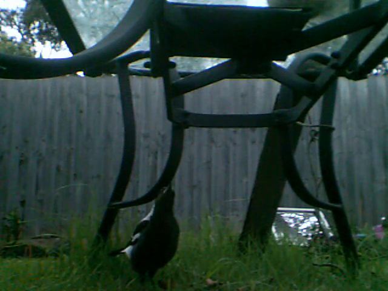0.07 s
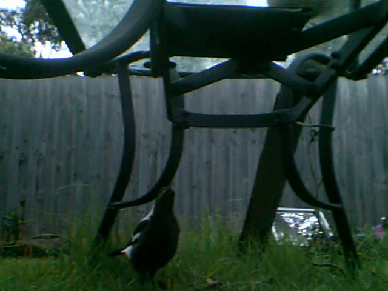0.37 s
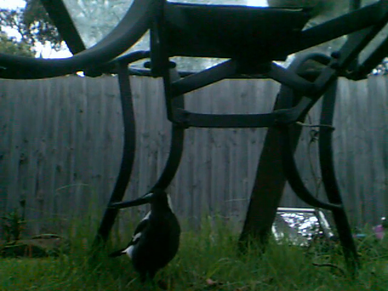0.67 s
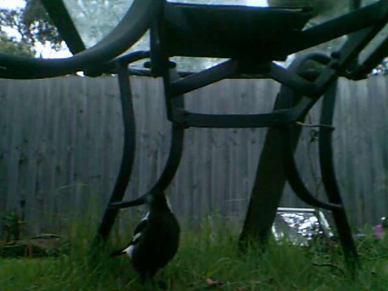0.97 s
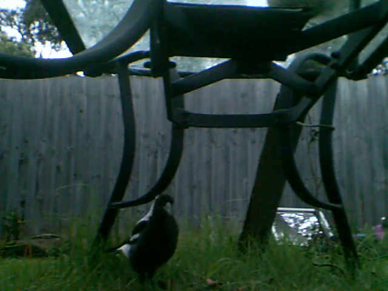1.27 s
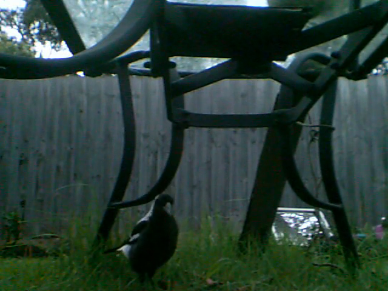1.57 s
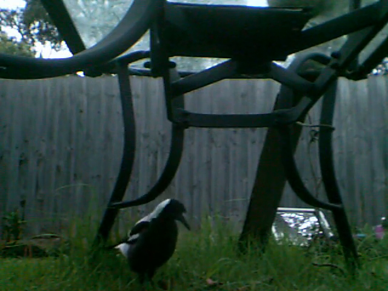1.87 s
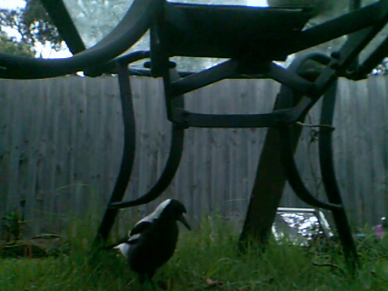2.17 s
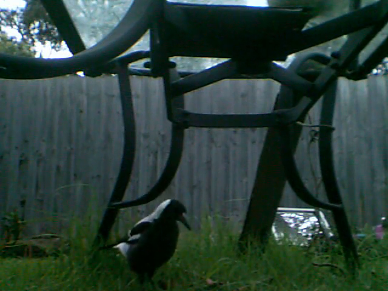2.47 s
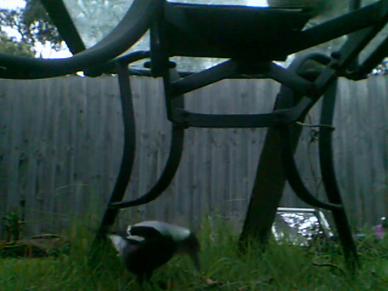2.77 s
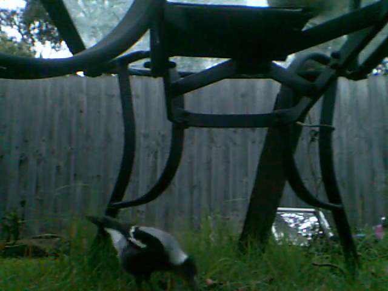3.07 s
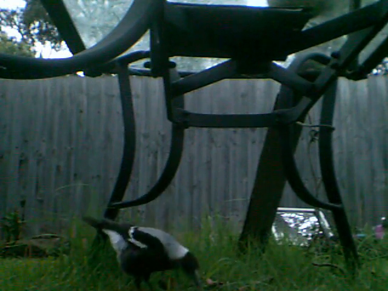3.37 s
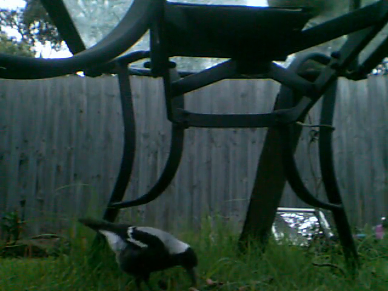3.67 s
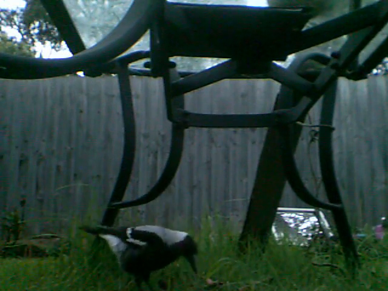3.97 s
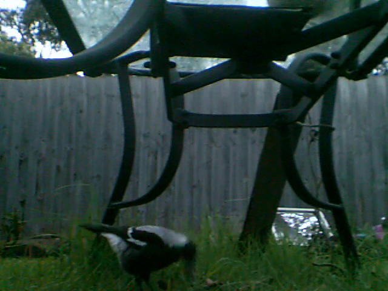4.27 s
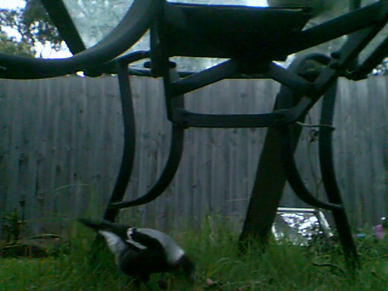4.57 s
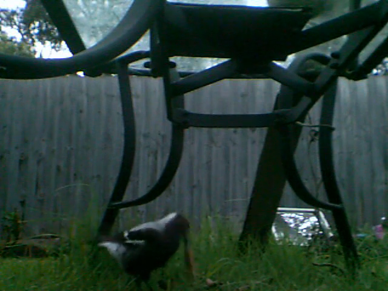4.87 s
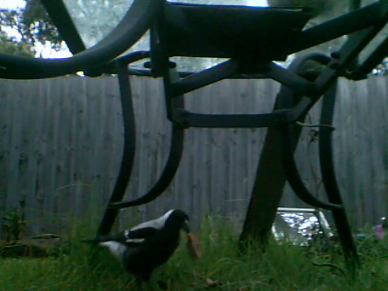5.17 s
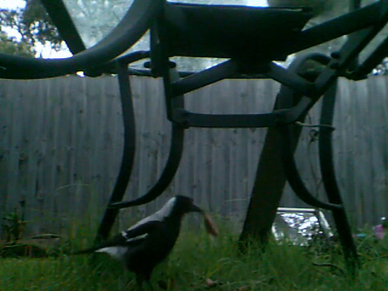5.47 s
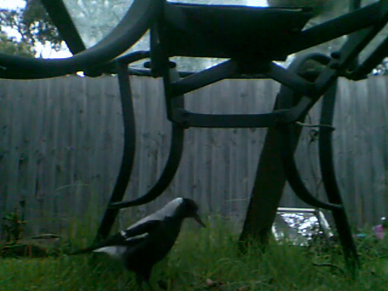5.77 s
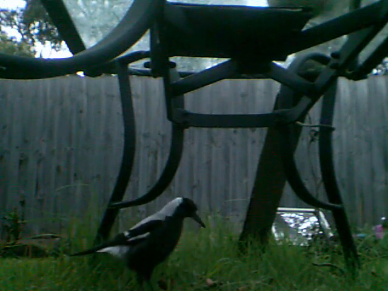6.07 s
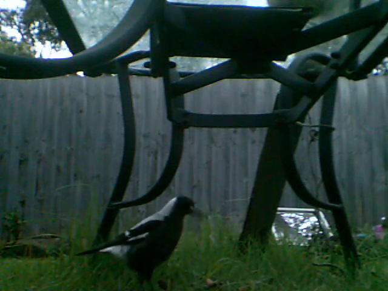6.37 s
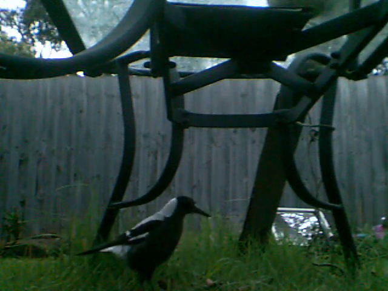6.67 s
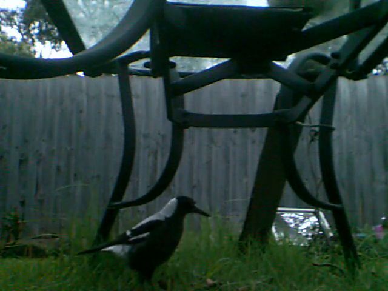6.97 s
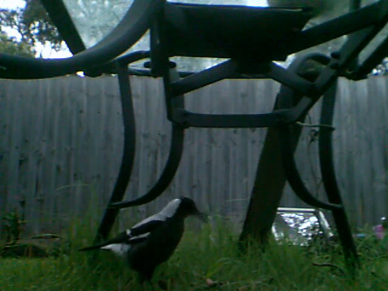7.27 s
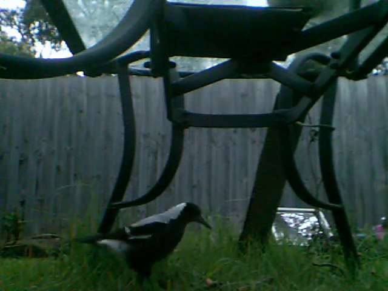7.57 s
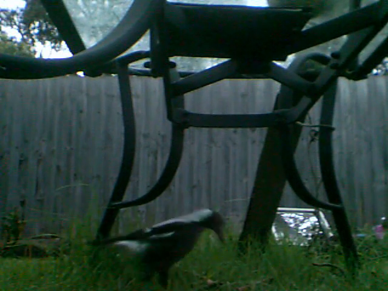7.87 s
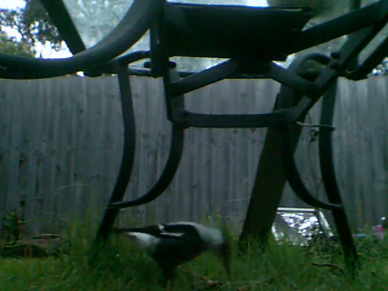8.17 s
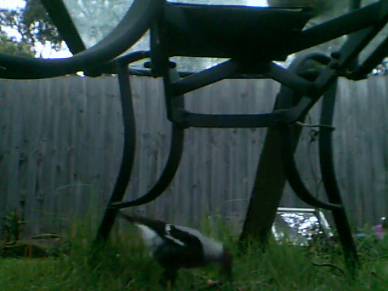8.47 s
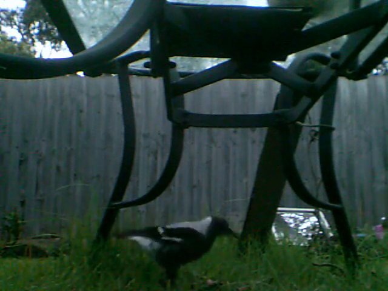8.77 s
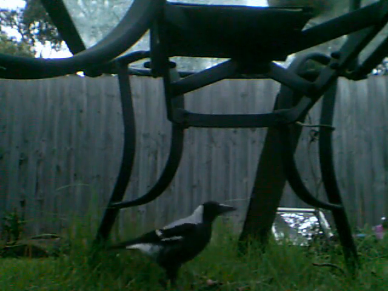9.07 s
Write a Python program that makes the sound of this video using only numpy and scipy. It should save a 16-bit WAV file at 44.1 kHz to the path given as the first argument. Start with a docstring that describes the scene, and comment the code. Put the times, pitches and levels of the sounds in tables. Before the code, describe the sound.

In a fenced garden, distant traffic rumbles while the microphone adds a fast low throb, hiss and a thin whine. Faint birds call far off. A nearby magpie gives one harsh caw, another over a falling whistle, then a quick run of rasping, swooping notes. A second bird answers with shrill chirps and screeches. The calls echo slightly, and the loudest peaks distort into brief clicks.

```python
"""Distant traffic and a faint engine hum behind a fenced garden; a small camera adds a fast low throb,
hiss and a thin whine. Far birds call now and then. A magpie gives one harsh caw just after 2 s, another
over a falling whistle just after 4 s, then a quick run of rasping, swooping notes: one side of its voice
box buzzes while the other sings clear tones. From about 6.7 s a second bird answers with shrill chirps.
The birds echo round the garden, and the loudest peaks clip, giving brief bright clicks."""
import sys
import numpy as np
from scipy import signal
from scipy.fft import rfft, irfft, next_fast_len
from scipy.io import wavfile

SR = 44100
rng = np.random.default_rng(int(sys.argv[2]) if len(sys.argv) > 2 else 0)


def to_wav(sig):
    """Store sig (one row per channel, or 1-D mono) as 16-bit WAV at the path in sys.argv[1].

    Samples outside -1..1 are clipped; the rate is SR.
    """
    pcm = np.clip(np.atleast_2d(sig), -1, 1) * 32767
    pcm = np.round(pcm).astype(np.int16)
    wavfile.write(sys.argv[1], SR, pcm.T)  # frames by channels


N = 406602
TIME = np.arange(N) / SR

# Levels in the tables are relative: the functions add their own gains.
# steady garden air and camera hiss: f/Hz, level/dB
AIR_SPECTRUM = [(300, -4), (450, -10), (1030, -4.5), (1430, -10.5), (1810, -9.5), (2600, -21.5),
                (3400, -23.5), (9300, -29.5), (11000, -59)]
# road rumble: f/Hz, level/dB
RUMBLE_SPECTRUM = [(8, -6.5), (20, 8), (130, -8.5), (200, -20.5), (310, -19.5), (700, -46)]
# traffic easing off and returning: t/s, tyre roar/dB, rumble/dB
TRAFFIC_LEVELS = [(0, -28.5, -21), (1.2, -33.5, -23), (4, -36, -23), (5.2, -31, -17.5), (9.22, -32, -19)]
# a far engine changing gear: t/s, f/Hz, level/dB
ENGINE_CURVE = [(3, 112, -34.5), (5.5, 115.5, -32), (6.1, 113, -21.5), (6.35, 97, -31), (7.6, 94.2, -29)]
# electrical dips in each camera throb: t/s into the cycle, chance (0-1), depth/dB, width/s
THROB_DIPS = [(.028, 1, -6.5, 0.0033), (.063, 0.47, -12, .006), (0.08, 1, -4, 0.0069),
              (0.087, .4, -4, 0.0027)]
# how long the garden's echo lasts: f/Hz, t/s to fade by 60 dB
ECHO_TIMES = [(1600, 0.35), (5500, 0.71), (7500, 0.51)]

# faint gliding notes: far birds, and last a low undertone beneath the second bird's final screech:
# t/s, length/s, first f/Hz, last f/Hz, level/dB
FAINT_GLIDES = [(1.5, 0.32, 5420, 5550, -61.5), (5.09, 0.17, 5470, 5620, -50), (7.64, 0.1, 2670, 3140, -47),
                (8.24, 0.08, 1930, 1850, -46.5)]
# a far bird's short two-toned calls: t/s, level/dB
FAR_CALL_TIMES = [(1.39, -58), (1.585, -59), (3.47, -56), (3.651, -59)]

# how the second bird's throat shapes its sound: f/Hz, level/dB
CHIRP_SPECTRUM = [(2000, -14), (3800, 15), (5400, 21), (7150, 11.5), (8100, 1)]
# its lower screeches: t/s, length/s, top f/Hz, level/dB, boost of the base tone/dB, roughness (0-1)
SCREECH_NOTES = [(6.729, 0.052, 2960, -30.5, 0, 0.73), (6.787, 0.042, 3570, -30, 1, 0.25),
                 (6.828, 0.025, 3040, -25.5, 2, 0.5), (6.904, 0.086, 3300, -29.5, -5, 0.84),
                 (6.996, 0.052, 3430, -23.5, -1.5, 0.79), (7.702, 0.046, 3780, -25, 4, 0.7),
                 (7.933, 0.055, 3710, -26.5, 9, 0.46), (8.137, 0.023, 3290, -27.5, -10, 0.23),
                 (8.164, 0.16, 3730, -31.5, 4, 0.75)]
# its high, clear peeps: t/s, length/s, top f/Hz, level/dB, length of the low note afterwards/s
PEEP_NOTES = [(6.861, 0.033, 5320, -21.5, 0), (7.05, 0.058, 5690, -17, 0),
              (7.116, 0.035, 5655, -19.5, 0.0039), (7.748, 0.011, 5300, -21.5, 0.022),
              (7.777, 0.025, 5430, -17, 0.004), (7.809, 0.036, 5440, -20, 0.0023),
              (7.99, 0.023, 5350, -23, 0.017), (8.027, 0.033, 5480, -22, 0.00072)]

# how the magpie's throat shapes its sound: f/Hz, level/dB
THROAT_SPECTRUM = [(600, -82), (1000, 14.5), (1650, 10.5), (2100, 4), (2550, 0), (2950, 5.5), (3200, -7),
                   (3450, -27.5)]
# the treble that its open beak lets out: f/Hz, level/dB
BEAK_SPECTRUM = [(3100, -25), (3650, -1.5), (4400, -6.5), (5000, -8), (5700, -1), (7100, -19), (11000, -28)]
# thin wheezes through the beak: t/s, length/s, level/dB
WHEEZE_NOTES = [(5.185, .075, -40), (5.439, 0.054, -38.5), (5.709, .075, -39), (5.961, 0.069, -40)]
# the long whistle catches once, swells and eases off: t/s, level/dB
WHISTLE_LEVELS = [(4.138, -29), (4.198, -48), (4.223, -32), (4.375, -24.5), (4.436, -30), (4.56, -33),
                  (4.74, -32)]
# short arched coos that lead from squawk to squawk: t/s, length/s, top f/Hz, level/dB
COO_NOTES = [(4.649, 0.059, 1698, -30), (4.733, 0.0195, 2147, -25.5), (4.843, 0.077, 1830, -24.5),
             (5.017, 0.05, 1920, -28), (5.414, 0.034, 1884, -25), (5.552, 0.02, 2024, -26.5),
             (5.691, 0.064, 1960, -28), (5.957, 0.056, 1800, -30)]
# whip notes: t/s of the drop, level/dB
WHIP_NOTES = [(5.099, -23.5), (5.229, -22.5), (5.329, -31), (5.436, -28.5), (5.586, -23.5)]
# a whip holds high, then drops nearly an octave: t/s from the drop, f/Hz
WHIP_CURVE = [(-.02, 2864), (-.006, 3024), (.002, 2780), (.02, 1705)]
# yodels: t/s of the top, level/dB
YODEL_NOTES = [(5.817, -27), (6.11, -26), (6.382, -31.5)]
# a yodel climbs, flips up to a high note and sinks: t/s from the top, f/Hz
YODEL_CURVE = [(-.03, 1924), (-.016, 2042), (-.008, 2810), (.005, 2906), (.018, 2500), (.045, 2354)]
# nasal caws of level pitch: t/s, length/s, throat/dB, treble/dB, swell/s
CAW_NOTES = [(2.256, 0.088, -32.5, -41.5, 0.012), (4.296, .125, -30.5, -40, 0.056)]
# tones inside the caws: t/s, length/s, f/Hz, jitter (share of the pitch), level/dB
CAW_TONES = [(2.258, 0.077, 2970, 0.03, -42), (2.272, 0.063, 2455, 0.1, -38.5), (2.274, .07, 4370, 0, -48),
             (4.332, 0.076, 2540, 0.05, -31.5)]
# the harsh, sinking squawks of its chatter: t/s, length/s, throat/dB, treble/dB, closing tone/dB
SQUAWK_NOTES = [(4.702, 0.07, -33, -37.5, -32), (4.868, 0.085, -27.5, -32.5, -44),
                (4.971, 0.042, -26.5, -38, -16), (5.123, 0.069, -26.5, -34, -20.5),
                (5.198, 0.06, -30, -33, -26.5), (5.322, 0.085, -27.5, -34.5, -23.5),
                (5.415, 0.078, -27, -34, -26), (5.559, 0.086, -30.5, -32, -23), (5.698, .07, -36, -37, -29),
                (5.807, 0.069, -29, -33, -23), (5.956, 0.06, -33, -35.5, -42),
                (6.096, 0.067, -30.5, -32, -21), (6.364, 0.064, -29.5, -37, -26)]


def gain_of(db):
    """Turns decibels into a number to multiply by."""
    return 10 ** (np.asarray(db) / 20)


def evened(x):
    """Scales a signal to an average strength (rms) of 1."""
    return x / np.sqrt(np.mean(x ** 2) + 1e-20)


def read(points, hz):
    """Looks up a table's value at hz, with octaves evenly spaced."""
    f, value = np.transpose(points)
    return np.interp(np.log(hz + 1), np.log(f + 1), value)


def follow(rows, t):
    """Joins a table's rows with straight lines and reads each column at times t."""
    s, *columns = np.transpose(rows)
    return [np.interp(t, s, c) for c in columns]


def add(mix, s, sound):
    """Lays a sound into the mix at s seconds."""
    part = mix[max(round(s * SR), 0):][:len(sound)]
    part += sound[:len(part)]


def coloured(x, spectrum):
    """Filters x by a table of f/Hz, level/dB; the result has strength 1."""
    size = next_fast_len(len(x) + 512)
    gains = gain_of(read(spectrum, np.fft.rfftfreq(size, 1 / SR)))
    return evened(irfft(rfft(x, size) * gains, size)[:len(x)])


def wander(size, hz):
    """A random drift of strength 1, no faster than about hz."""
    knots = rng.standard_normal(size // 16 + 2)
    f = np.fft.rfftfreq(len(knots), 16 / SR)
    slow = evened(irfft(rfft(knots) / (1 + (f / hz) ** 4), len(knots)))
    return np.interp(np.linspace(0, len(slow) - 1, size), np.arange(len(slow)), slow)


def fade(t, rise, fall):
    """A soft start and end, lasting rise and fall seconds."""
    fade_in = np.sin(np.pi / 2 * np.clip((t - t[0]) / rise, 0, 1))
    fade_out = np.sin(np.pi / 2 * np.clip((t[-1] - t) / fall, 0, 1))
    return fade_in * fade_out


def phase_of(hz, jitter, jitter_hz):
    """The running angle of a vibration whose pitch trembles by the share jitter."""
    return 2 * np.pi * np.cumsum(hz * (1 + jitter * wander(len(hz), jitter_hz))) / SR


def notes(rows, jitter, flutter_db, overhang_s, overtone_db=-30, arch=0):
    """Short, shaky gliding tones from rows of t/s, length/s, first f/Hz, last f/Hz, level/dB."""
    out = np.zeros(N)
    for s, length, first_hz, last_hz, db in rows:
        t = np.arange(-overhang_s, length + overhang_s, 1 / SR)
        hz = first_hz + (last_hz - first_hz) * t / length
        hz *= 1 - arch * (2 * t / length - 1) ** 2  # arch bends both ends down
        phase = phase_of(hz, jitter, 350)
        tone = np.sin(phase) + gain_of(overtone_db) * (np.sin(2 * phase) + np.sin(3 * phase))
        tone = evened(tone * gain_of(flutter_db * wander(len(t), 115)))
        add(out, s - overhang_s, gain_of(db) * tone * fade(t, 2 * overhang_s, 2 * overhang_s))
    return out


def air_and_traffic(air_db=-34):
    """Steady air and hiss, with a swelling tyre roar near 1 kHz and a low road rumble."""
    roar_db, rumble_db = follow(TRAFFIC_LEVELS, TIME)
    air = gain_of(air_db) * coloured(rng.standard_normal(N), AIR_SPECTRUM)
    roar = coloured(rng.standard_normal(N), [(500, -21.5), (850, -1.5), (1100, 0), (2400, -52.0)])
    roar *= gain_of(roar_db - 2.0 + 0.76 * wander(N, 16))
    rumble = gain_of(rumble_db) * coloured(rng.standard_normal(N), RUMBLE_SPECTRUM)
    return air + roar + rumble


def engine(octave_db=-16):
    """A far engine's firing makes a wavering hum, with a weaker tone an octave up."""
    hz, db = follow(ENGINE_CURVE, TIME)
    phase = phase_of(hz, 0.01506, 7.4)
    hum = evened(np.sin(phase) + gain_of(octave_db) * np.sin(2 * phase))
    return gain_of(db + 2.0 * wander(N, 6.8)) * hum


def camera(throb_hz=10, sharpness=1.174, low_cut_hz=11, whine_hz=9600, whine_db=-61):
    """Regular bursts of current dent the signal, which swings back each time; a thin whine runs along."""
    t, dents = np.arange(-.02, .02, 1 / SR), np.zeros(N)
    starts = np.arange(0, N / SR, 1 / throb_hz)
    for offset, chance, db, width in THROB_DIPS:
        dip = gain_of(db) * np.exp(-abs(t / width) ** sharpness)
        for s in starts[rng.random(len(starts)) < chance]:
            add(dents, s + offset + t[0], -dip)
    throb = signal.sosfilt(signal.butter(2, low_cut_hz, "high", fs=SR, output="sos"), dents)
    whine = np.sqrt(2) * np.sin(2 * np.pi * whine_hz * TIME)
    return throb + gain_of(whine_db) * whine


def garden(x, early_db, tail_db):
    """Adds a few hard echoes from fence and furniture, then a soft tail from trees and houses."""
    t = np.arange(SR) / SR
    early = np.zeros(SR)
    early[rng.integers(150, 1100, 10)] = rng.choice([-1., 1.], 10)  # ten echoes, 3-25 ms late
    scatter = rng.standard_normal(SR) * (rng.random(SR) < 2000 / SR) * (t > .012)
    hz, times, bands = signal.stft(scatter, SR, nperseg=256)
    decay = gain_of(-60 * times / read(ECHO_TIMES, hz)[:, None])
    tail = signal.istft(bands * decay, SR, nperseg=256)[1][:SR]
    echo = gain_of(early_db) * early / np.linalg.norm(early)
    echo += gain_of(tail_db) * tail / np.linalg.norm(tail)
    return x + signal.fftconvolve(x, echo)[:N]


def faint_notes(call_s=0.035, call_hz=(2370, 2860)):
    """Far birds' glides and two-toned calls, and an undertone beneath the second bird's last screech."""
    calls = [(s, call_s, hz, hz, db) for s, db in FAR_CALL_TIMES for hz in call_hz]
    return notes(FAINT_GLIDES + calls, jitter=0.011, flutter_db=5.5, overhang_s=0.026)


def chirp(t, hz, db, rough, boost_db, jitter=0.0485, warble=0.096):
    """The second bird's throat favours the base tone or its octave, whichever is nearer its peak."""
    hz = hz * (1 + warble * rough * wander(len(t), 70.5))
    phase = phase_of(hz, jitter * rough, 460)
    base = gain_of(read(CHIRP_SPECTRUM, hz) + boost_db)
    octave = gain_of(read(CHIRP_SPECTRUM, 2 * hz))
    tone = (base * np.sin(phase) + octave * np.sin(2 * phase)) / np.hypot(base, octave)
    # strong and weak cycles take turns, which makes it screech
    tone += 1.04 * rough ** 2 * (np.sin(phase / 2) + np.sin(3 / 2 * phase))
    shake = gain_of(rough * (5.1 * wander(len(t), 160) - 9.0))
    return np.sqrt(2) * gain_of(db) * shake * tone * fade(t, 0.0025, 0.0048)


def screeches(arch=0.069):
    """The second bird's lower voice: rough notes that rise and fall a little."""
    out = np.zeros(N)
    for s, length, top_hz, db, boost_db, rough in SCREECH_NOTES:
        t = np.arange(0, length, 1 / SR)
        hz = top_hz * (1 - arch * (2 * t / length - 1) ** 2)
        add(out, s, chirp(t, hz, db, rough, boost_db))
    return out


def peeps(low_hz=3740, leap_s=0.0074, sag_hz=437, low_db=-3, fade_db_per_s=150):
    """The second bird leaps into its high, clear voice, sags, and mostly drops back down."""
    out = np.zeros(N)
    for s, length, top_hz, db, linger in PEEP_NOTES:
        t = np.arange(0, length + linger, 1 / SR)
        from_edge_s = np.minimum(t + leap_s / 2, length - t if linger else length)
        high = np.sin(np.pi / 2 * np.clip(from_edge_s / leap_s, 0, 1)) ** 2  # 0 low voice, 1 high
        hz = low_hz + high * (top_hz - sag_hz * (t / length) ** 2 - low_hz)
        level_db = db + low_db * (1 - high) - fade_db_per_s * t
        add(out, s, chirp(t, hz, level_db, rough=0.12, boost_db=8))
    return out


def wheezes(first_hz=3960, last_hz=4550):
    """Fuzzy rising tones through the magpie's open beak."""
    rows = [(s, length, first_hz, last_hz, db) for s, length, db in WHEEZE_NOTES]
    return notes(rows, jitter=0.057, flutter_db=2.5, overhang_s=0.0075)


def whistle(first_hz=1810, sag_hz=498.7, bend=1.35, overtone_db=-14):
    """A wavering tone that sinks ever faster; an overtone grows while the magpie pushes harder."""
    t, out = np.arange(WHISTLE_LEVELS[0][0], WHISTLE_LEVELS[-1][0], 1 / SR), np.zeros(N)
    progress = np.linspace(0, 1, len(t))
    db = follow(WHISTLE_LEVELS, t)[0] + 2.3 * wander(len(t), 39)
    phase = phase_of(first_hz - sag_hz * progress ** bend, 0.011, 166)
    push = np.interp(progress, [.25, .7, 1], [0, 1, 0])
    tone = np.sin(phase) + push * gain_of(overtone_db) * np.sin(3 * phase)
    add(out, t[0], np.sqrt(2) * gain_of(db) * tone * fade(t, .02, 0.018))
    return out


def swoops(rows, pitch, slope_db_per_s, jitter=0.032, edge_s=0.0013):
    """A clear tone follows the pitch curve once per row, swelling or fading from near its top."""
    t, out = np.arange(pitch[0][0], pitch[-1][0], 1 / SR), np.zeros(N)
    for s, db in rows:
        tone = np.sin(phase_of(follow(pitch, t)[0], jitter, 270))
        level = gain_of(db + slope_db_per_s * np.maximum(t, 0))
        add(out, s + t[0], level * tone * fade(t, edge_s, edge_s))
    return out


def clear_notes(closing_s=.052, first_hz=1660, last_hz=1488):
    """The clear side of the magpie's voice box: a sinking tone to end each squawk, and arched coos."""
    closing = []
    for s, length, _, _, tone_db in SQUAWK_NOTES:
        span = min(closing_s, length - .022)
        closing.append((s + length - span, span, first_hz, last_hz, tone_db))
    coos = [(s, length, hz, hz, db) for s, length, hz, db in COO_NOTES]
    return (notes(closing, jitter=0.03, flutter_db=2.0, overhang_s=.004)
            + notes(coos, jitter=0.026, flutter_db=4.0, overhang_s=0.0048, arch=0.1106))


def caw_tones():
    """The held tones that make a caw nasal; the most shaky ones sound hoarse."""
    return sum(notes([(s, length, hz, hz, db)], jitter, flutter_db=4.0, overhang_s=.005)
               for s, length, hz, jitter, db in CAW_TONES)


def rasps(pitch_hz=812, squawk_sag=.25, squawk_swell_s=.016, flutter_db=3.0, breath=.29):
    """The voice box's other side buzzes unevenly and chops the air; throat and beak shape the sound."""
    out = np.zeros(N)
    caws = [(*row, 0) for row in CAW_NOTES]  # caws do not sag
    squawks = [(*row[:-1], squawk_swell_s, squawk_sag) for row in SQUAWK_NOTES]
    for s, length, throat_db, treble_db, swell, sag in caws + squawks:
        t = np.arange(-.006, length + 0.012, 1 / SR)
        # the brighter a call, the rougher it gets and the further a squawk's pitch sags
        rough = np.interp(treble_db - throat_db, [-14, -6], [.15, 1])
        hz = pitch_hz * (1 + sag * rough ** 3 * (.5 - t / length))
        phase = phase_of(hz, .028 + .03 * rough, 240)
        buzz = evened(sum(np.cos(k * phase) for k in range(1, 12)))
        puffs = evened((1 + np.cos(phase)) * rng.standard_normal(len(t)))
        source = (buzz * (1 - breath) + puffs * breath) * gain_of(flutter_db * wander(len(t), 380))
        throat = gain_of(throat_db + 2.0) * coloured(source, THROAT_SPECTRUM)
        beak = gain_of(treble_db - 8.0) * coloured(source, BEAK_SPECTRUM)
        add(out, s - .006, (throat + beak) * fade(t, swell, 0.027))
    return out


def magpie(direct_lead_s=.023, direct_db=-9.5):
    """The bird is half hidden: its weak direct sound comes just before a stronger bounce off a wall."""
    bounce = caw_tones() + clear_notes() + rasps() + wheezes() + whistle()
    bounce += swoops(WHIP_NOTES, WHIP_CURVE, slope_db_per_s=208)
    bounce += swoops(YODEL_NOTES, YODEL_CURVE, slope_db_per_s=-168)
    direct = gain_of(direct_db) * np.roll(bounce, -round(direct_lead_s * SR))
    return direct + bounce


def scene():
    """The near magpie, the second bird and the far birds echo over the steady sounds, in mono."""
    near, faint = magpie(), faint_notes()
    birds = gain_of(4.0) * garden(near, early_db=-13, tail_db=-9)
    birds += gain_of(-3.0) * garden(screeches() + peeps(), early_db=-12.0, tail_db=-6.0)
    birds += gain_of(5.0) * garden(faint, early_db=-16, tail_db=3.0)
    return (birds + air_and_traffic() + engine() + camera())[None]


def record(dry, ceiling=0.65, first_cut_hz=10900, final_cut_hz=15800):
    """The high treble is cut and the loudest peaks clip, giving brief bright clicks."""
    first_filter = signal.firwin(201, first_cut_hz, window=("kaiser", 8), fs=SR)
    final_filter = signal.firwin(511, final_cut_hz, window=("kaiser", 9), fs=SR)
    narrow = signal.oaconvolve(dry, first_filter[None], "same")
    clipped = np.clip(narrow, -ceiling, ceiling)
    return signal.oaconvolve(clipped, final_filter[None], "same")


dry = scene()
out = record(dry)
to_wav(out)
```